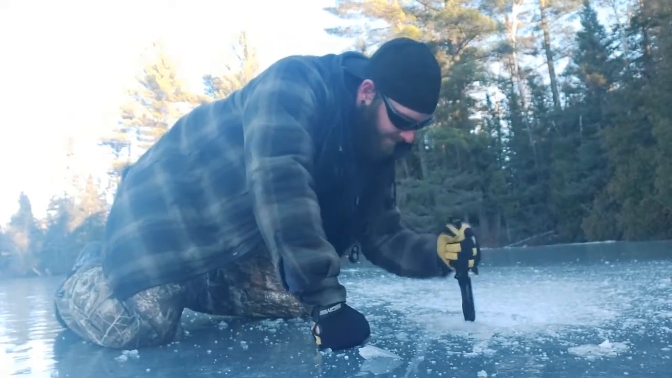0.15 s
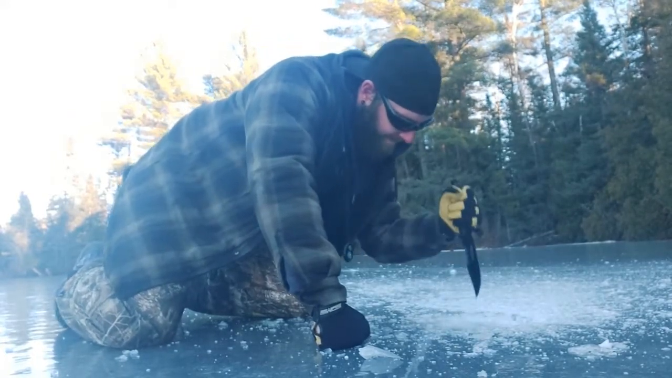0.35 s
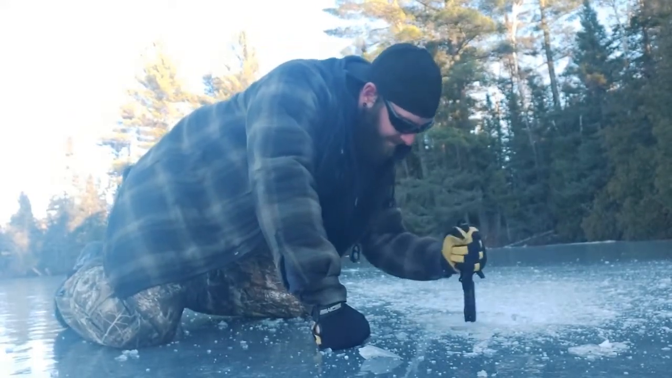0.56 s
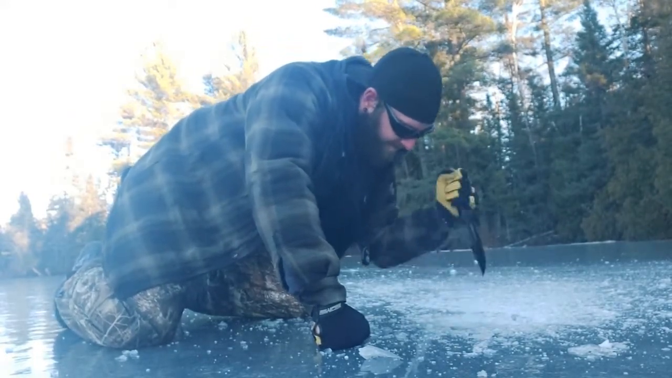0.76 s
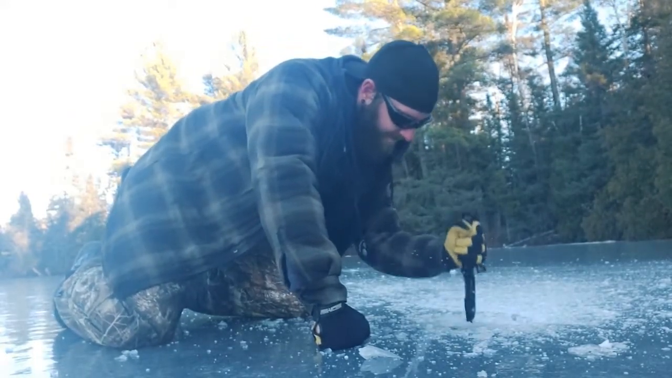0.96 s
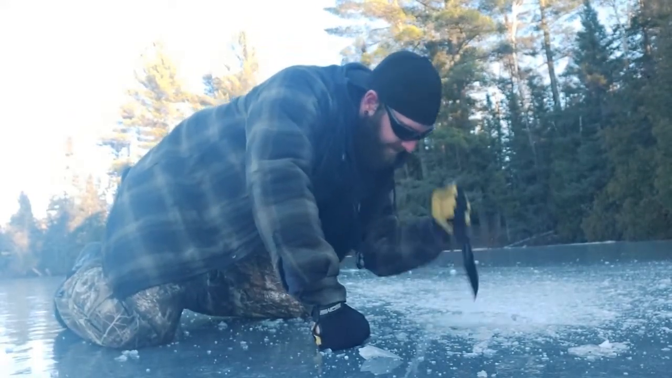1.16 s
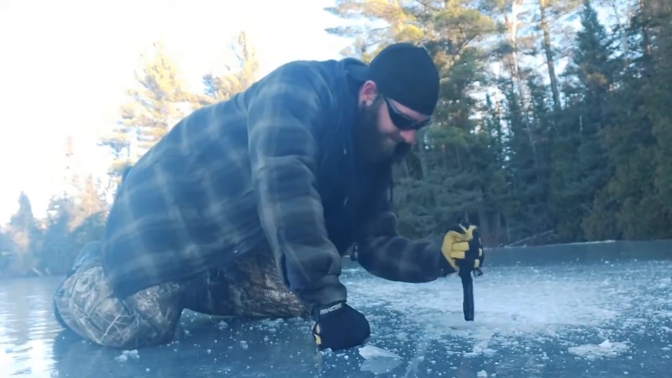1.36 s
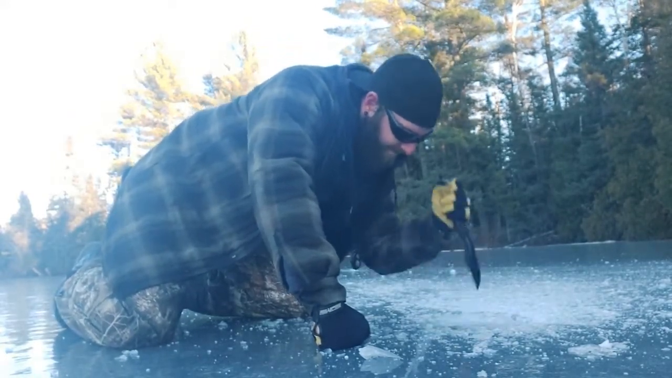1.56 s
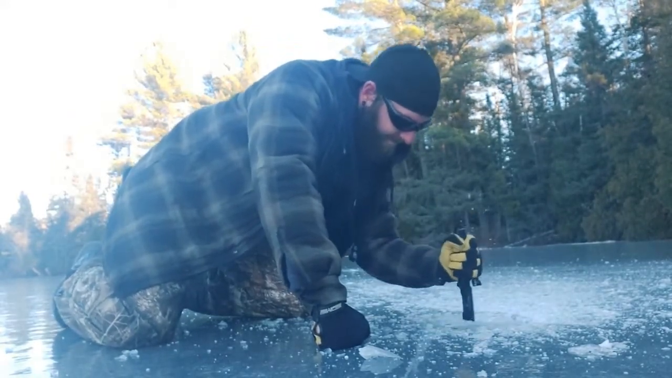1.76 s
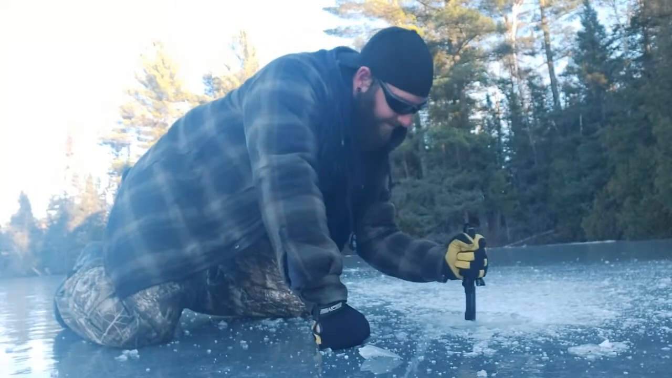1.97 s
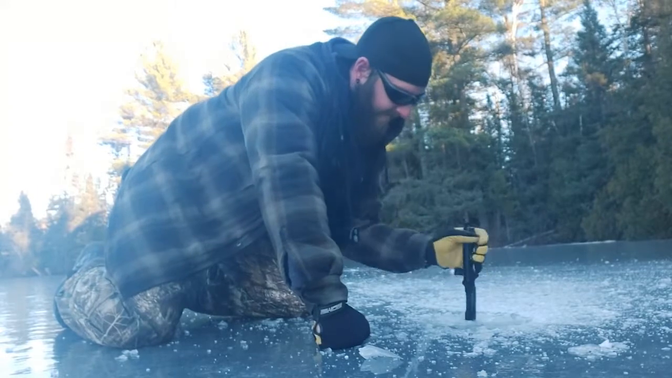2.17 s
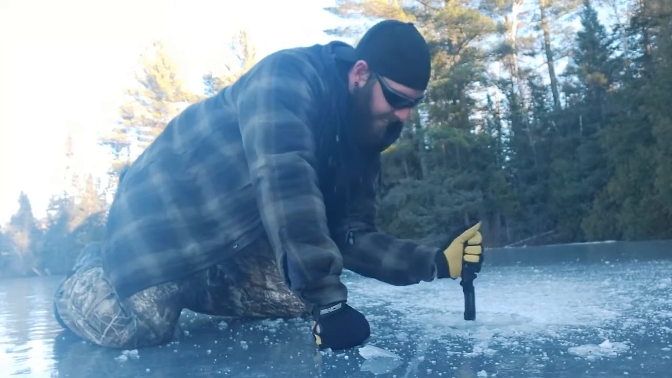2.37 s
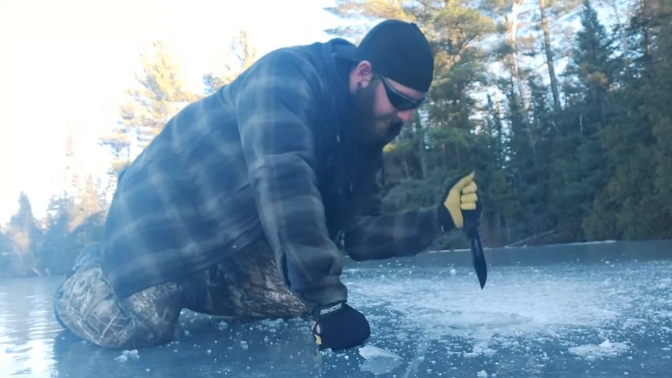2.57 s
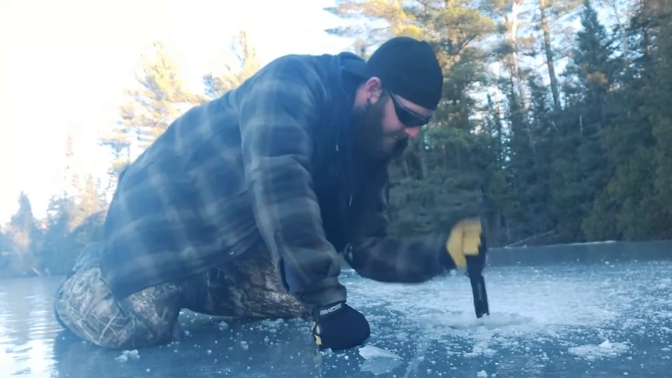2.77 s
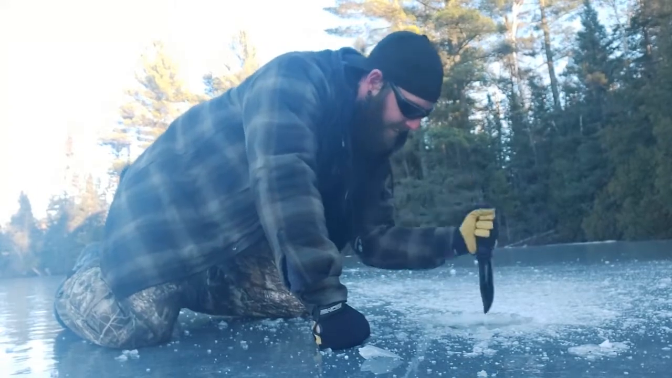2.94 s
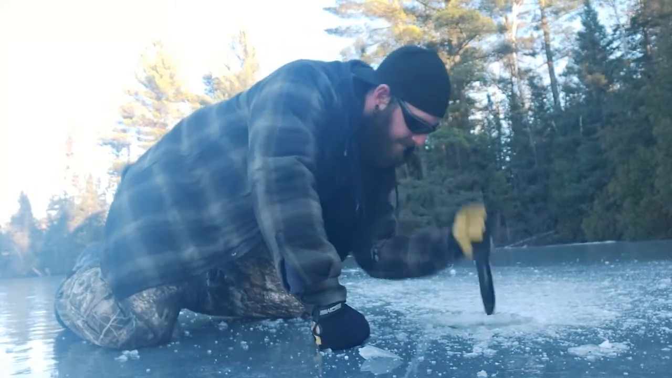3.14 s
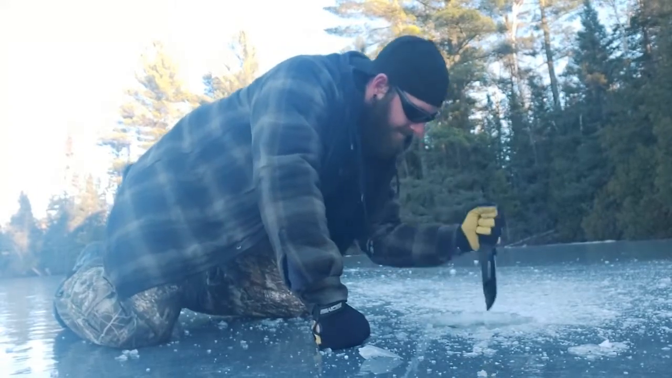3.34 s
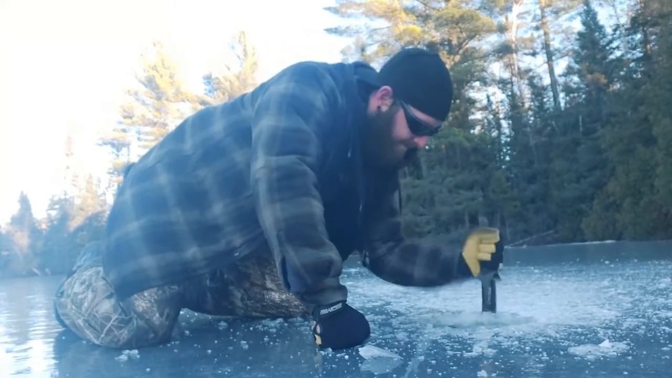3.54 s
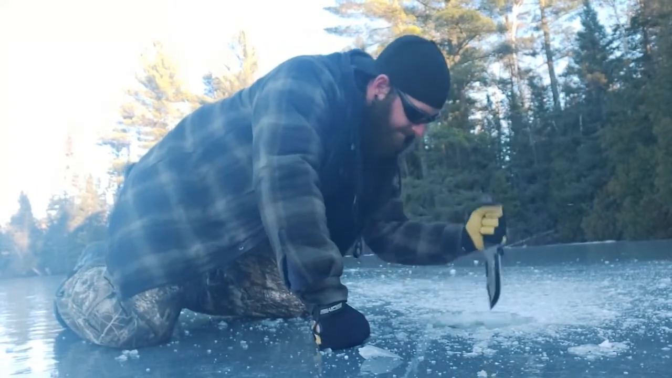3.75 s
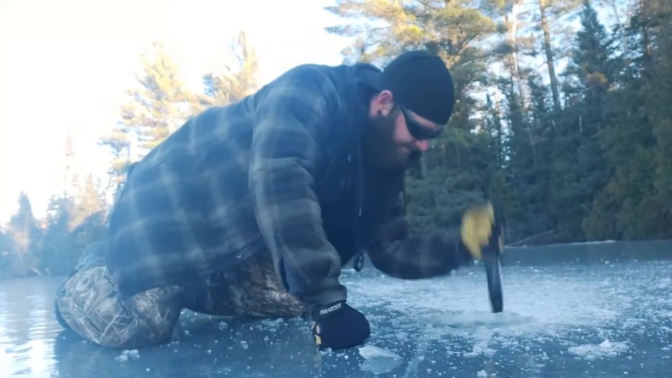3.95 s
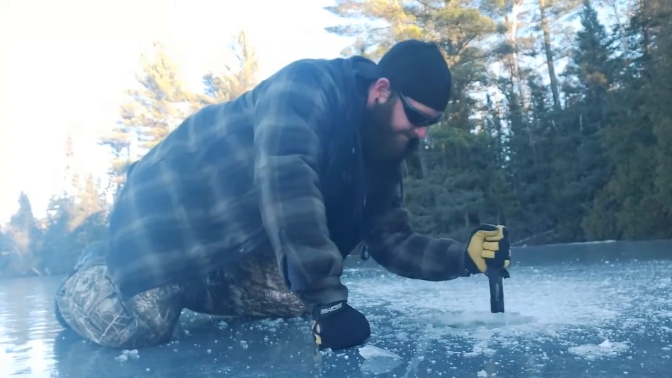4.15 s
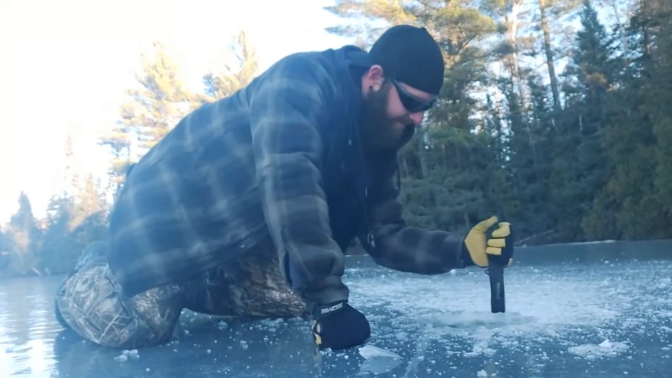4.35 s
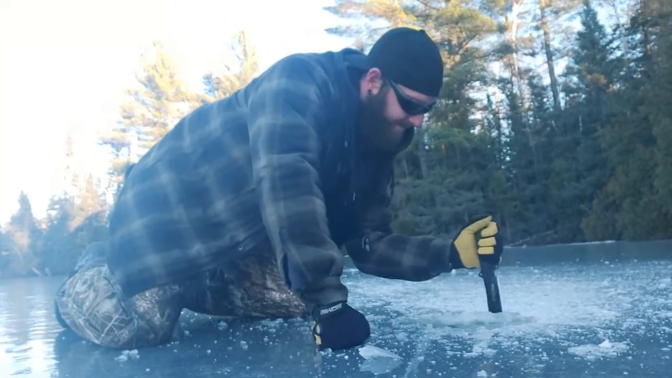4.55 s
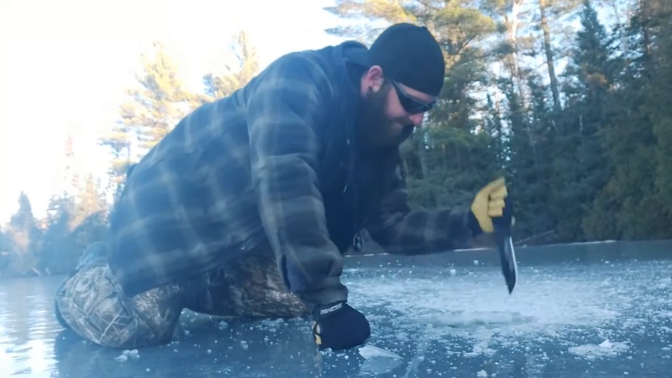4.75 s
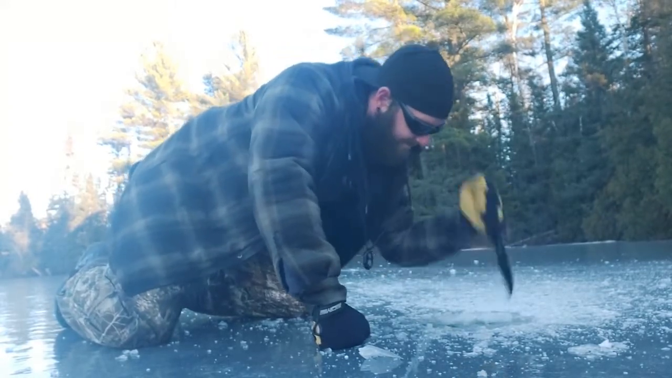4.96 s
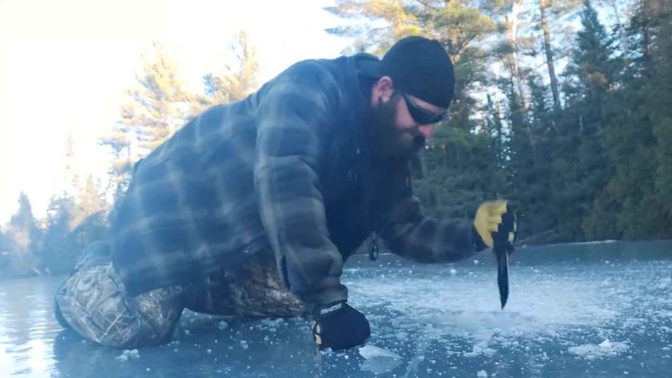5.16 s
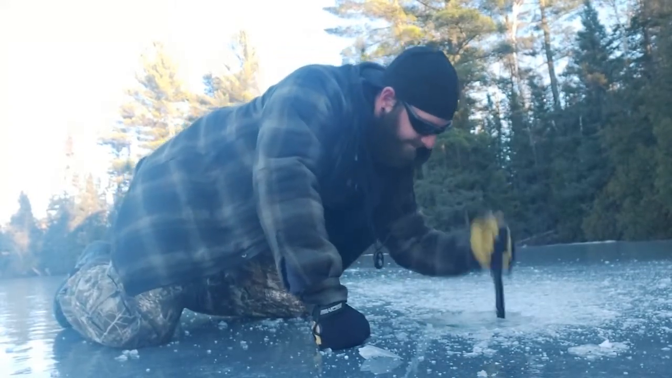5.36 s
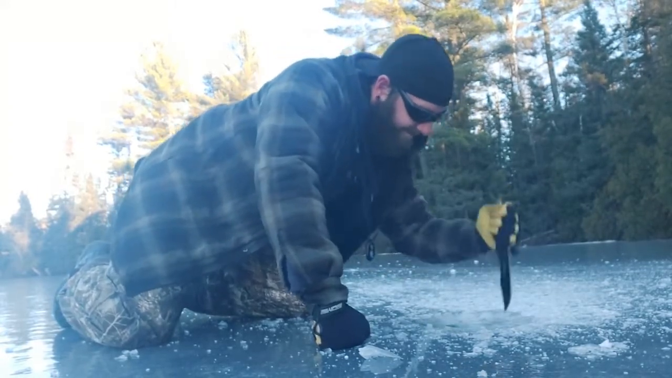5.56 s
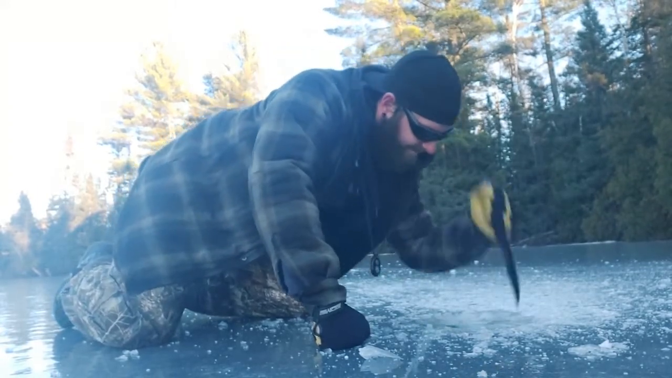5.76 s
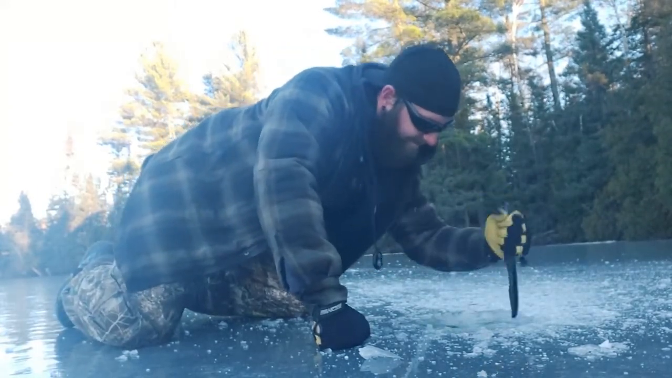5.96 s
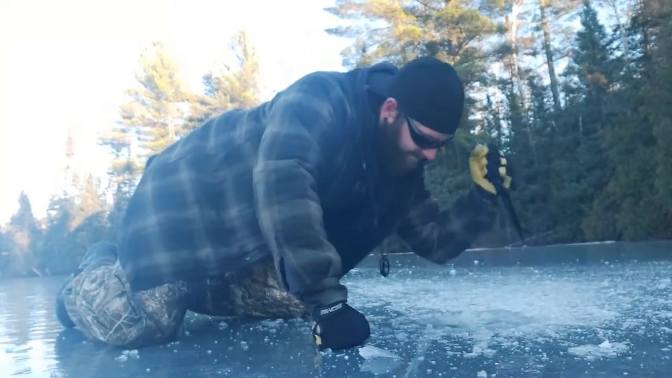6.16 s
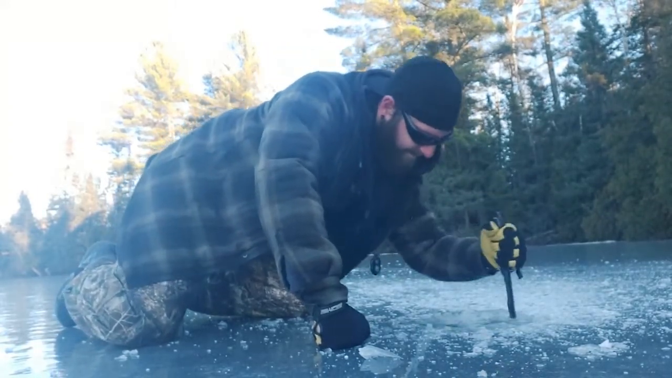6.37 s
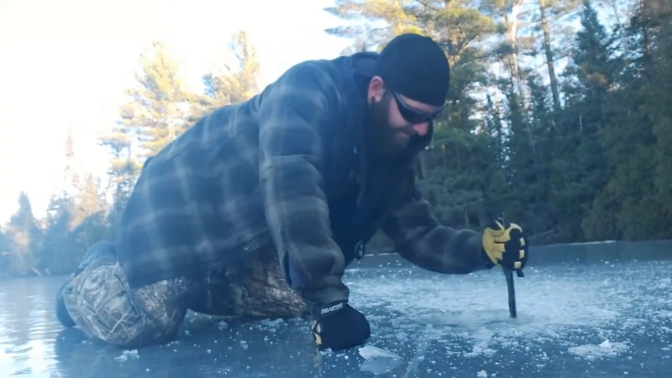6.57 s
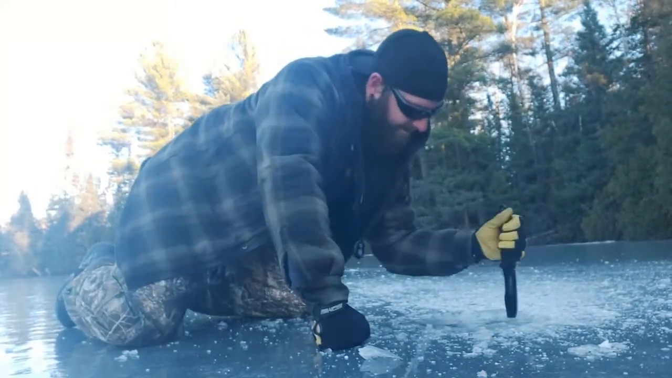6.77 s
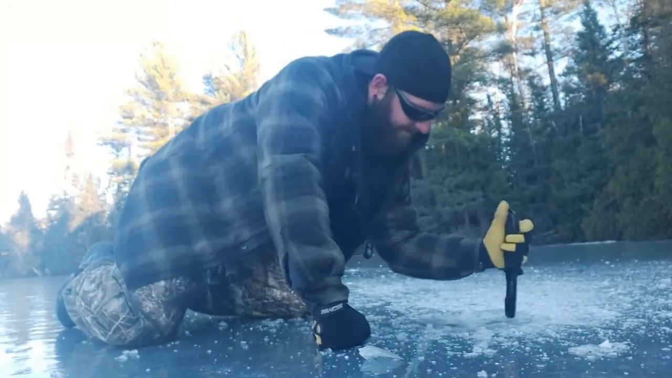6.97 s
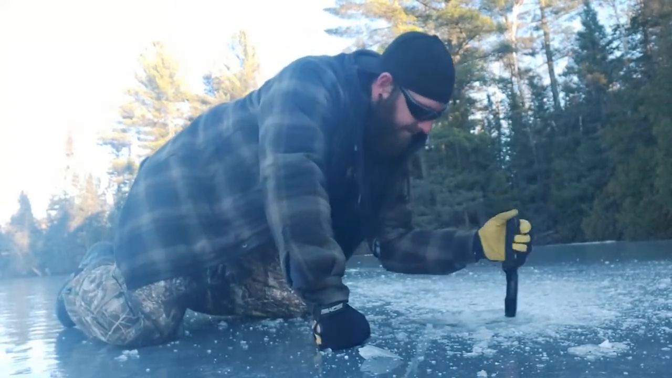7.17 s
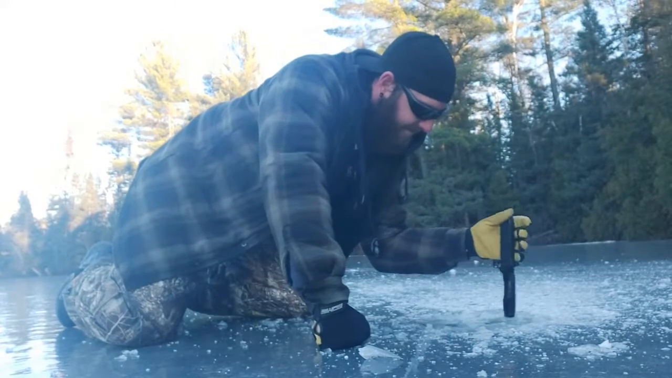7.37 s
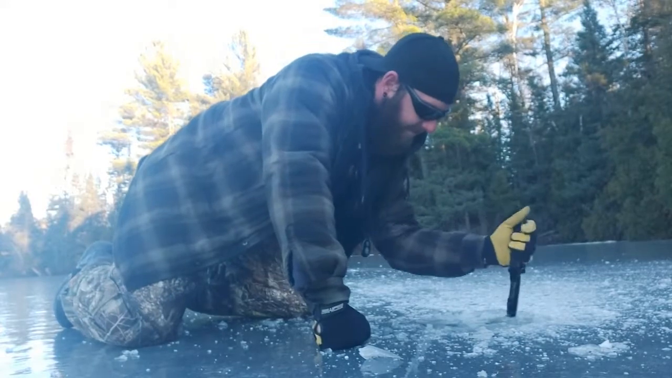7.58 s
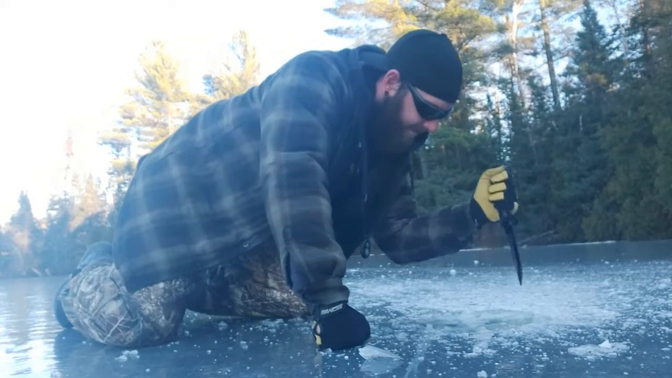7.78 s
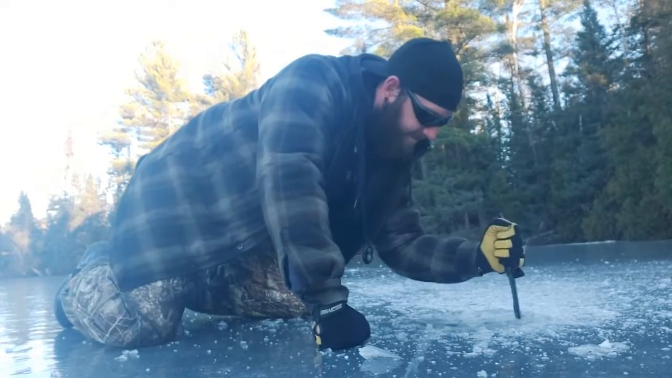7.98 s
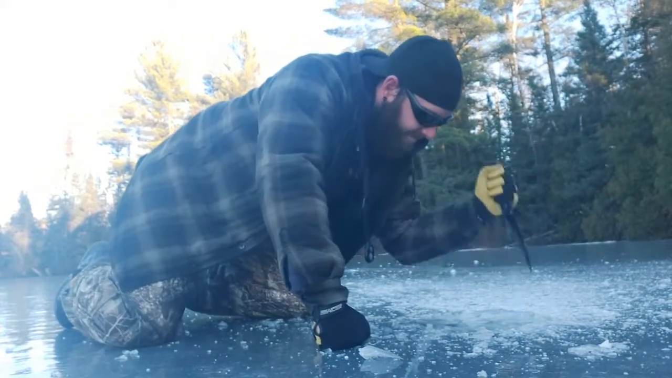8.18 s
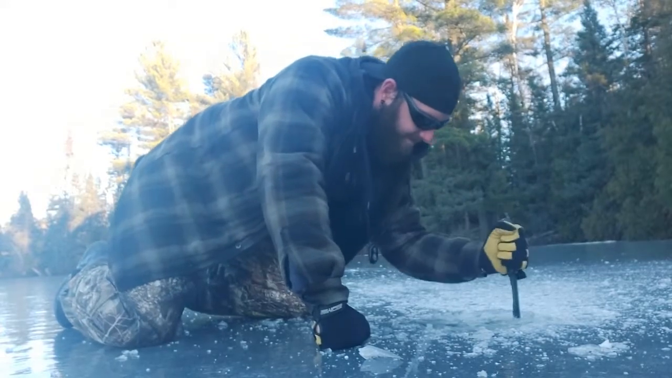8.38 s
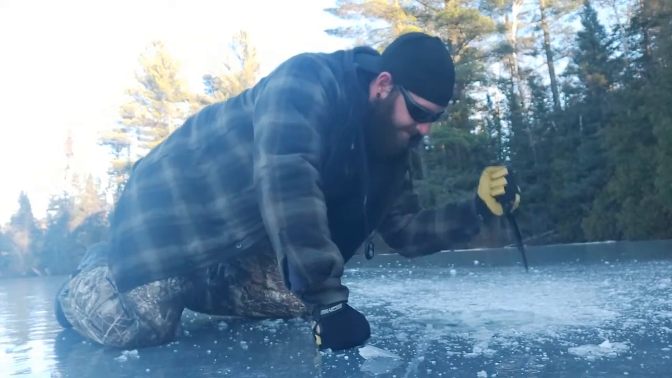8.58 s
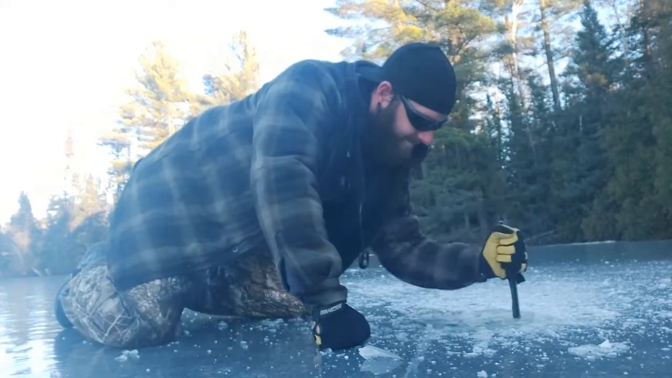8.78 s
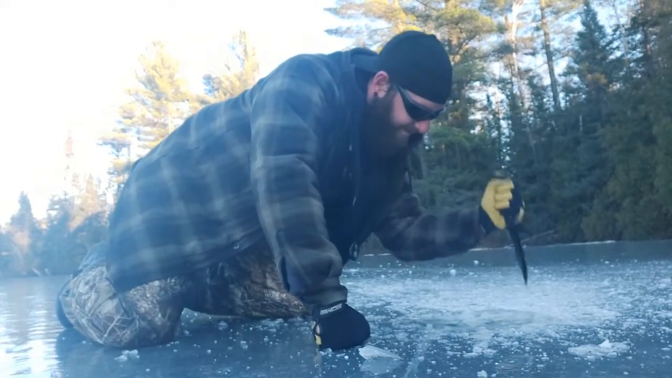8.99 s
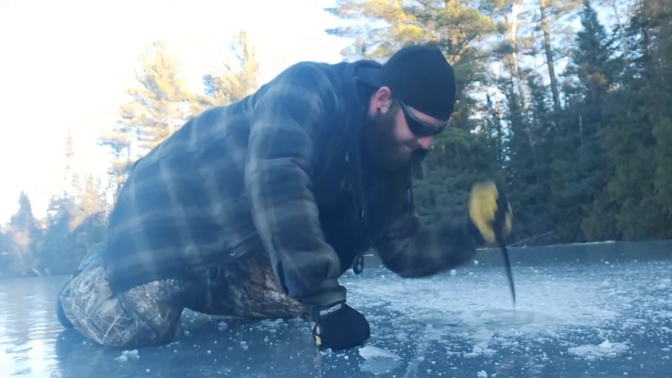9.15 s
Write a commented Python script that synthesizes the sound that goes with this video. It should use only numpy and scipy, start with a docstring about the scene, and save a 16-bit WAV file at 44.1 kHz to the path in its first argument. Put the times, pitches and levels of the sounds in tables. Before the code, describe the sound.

A knife stabs thick lake ice about a metre from the microphone, in four runs of strikes with pauses of a second or so between them. Each stab is a brittle crunch and crack ending in a dull thump, followed by chips ticking across the surface. In the pauses gloves and sleeves rustle softly and the blade faintly creaks loose. Wind gusts rumble on the microphone, easing towards the end.

```python
"""Stabbing lake ice in the wind

A knife stabs thick lake ice a metre from a small stereo microphone. Each stab crunches in by brittle
fracture, splits the ice and ends in a dull thump that excites the sheet's bending modes; chips spray,
skitter and tick over it. Gloves and sleeves rustle by friction, and the blade creaks and grinds loose
by stick-slip. Turbulent gusts buffet the two microphone ports independently."""
import sys
import numpy as np
from scipy import signal
from scipy.fft import rfft, irfft
from scipy.io import wavfile
from scipy.ndimage import uniform_filter1d, map_coordinates

SR = 44100
rng = np.random.default_rng(int(sys.argv[2]) if len(sys.argv) > 2 else 0)


def master_out(mix):
    """Clip the mix to full scale and print it as 16-bit PCM to the path in sys.argv[1]."""
    frames = np.transpose(np.atleast_2d(mix))
    ceiling = np.clip(frames, -1, 1)
    pcm = np.round(ceiling * 32767).astype(np.int16)
    wavfile.write(sys.argv[1], SR, pcm)


N = 406602
T = np.arange(N) / SR


def undb(db):
    return 10 ** (np.asarray(db) / 20)


def unit(x):
    return x / np.sqrt(np.mean(x ** 2))


def noise(*shape):
    return rng.standard_normal(shape + (N,))


def band(x, lo_hz, hi_hz, order=2):
    sos = signal.butter(order, [lo_hz, min(hi_hz, .45 * SR)], "band", fs=SR, output="sos")
    return signal.sosfilt(sos, x)


def colour(x, points):
    """Minimum-phase filter through (Hz, dB) points, by folding the cepstrum."""
    hz, db = np.transpose(points)
    grid = np.maximum(np.fft.rfftfreq(2048, 1 / SR), 1)
    cepstrum = irfft(np.interp(np.log(grid), np.log(hz), db) * np.log(10) / 20)
    cepstrum[1:1024] *= 2
    response = irfft(np.exp(rfft(cepstrum[:1024], 2048)))[None, :1024]
    return signal.fftconvolve(x, response, axes=-1)[..., :N]


def walk(rate):
    """Random modulation of unit RMS: levels held 1 / rate s, smoothed twice."""
    hold = int(SR / rate)
    steps = np.repeat(rng.standard_normal(N // hold + 1), hold)
    return unit(uniform_filter1d(uniform_filter1d(steps, hold), hold)[:N])


def add(track, s, sound):
    i = int(s * SR)
    if i < N:
        track[i:i + len(sound)] += sound[:N - i]


def ring(hz, t60, glide=0):
    """A damped mode whose pitch may rise as it dies."""
    t = np.arange(int(t60 * SR) + 8) / SR
    return np.sin(2 * np.pi * hz * t * (1 + glide * t / t60)) * undb(-60 * t / t60)


def burst(rise, fall):
    """Transient envelope: quadratic rise to 1, exponential decay."""
    t = np.arange(int((rise + 7 * fall) * SR)) / SR
    return np.where(t < rise, (t / rise) ** 2, np.exp(-(t - rise) / fall))


def gritty(spread_db, *shape):
    """Heavy-tailed noise: tiny impulses of widely scattered size."""
    return unit(noise(*shape) * undb(spread_db * np.minimum(rng.exponential(size=N), 4)))


BREEZE_DB = -39  # reference wind level for the flutter and the air
# Strength of the wind on the ports (time [s], level [dB])
WIND_LEVELS = [(0.0, -37), (0.46, -39.5), (1.15, -38.5), (1.85, -39), (2.4, -37), (2.73, -47), (2.95, -43),
               (3.36, -32), (3.82, -34.5), (4.11, -31), (4.52, -35), (5.29, -39.5), (5.6, -37),
               (6.35, -48.5), (6.9, -39.5), (7.09, -52), (7.2, -35.5), (7.35, -44), (7.62, -55.5),
               (7.84, -38), (8.3, -51.5), (8.85, -44), (8.98, -51), (9.22, -64)]
# The hardest single buffets (time [s], level [dB], frequency [Hz])
WIND_BUFFETS = [(0.612, -26, 280), (0.637, -25, 200), (0.922, -23, 277), (0.954, -25.5, 148),
                (1.189, -23, 80.5), (2.039, -27, 80), (2.126, -24.5, 89), (2.284, -24, 119),
                (3.135, -18.5, 107.7), (3.552, -23, 91), (4.094, -23.5, 80), (4.242, -24.5, 200),
                (4.304, -24, 290), (4.514, -26.5, 97.4), (5.634, -22.5, 88.85), (7.188, -29.5, 72),
                (7.284, -27.5, 110.7)]


def wind(gust_db=3.5, buffet_cycles=0.88):
    """Turbulent pressure: each port meets its own eddies, heard as rumble, flutter and buffets."""
    wind_db = np.interp(T, *np.transpose(WIND_LEVELS)) + gust_db * walk(30)
    flutter_db = -47.5 + 0.91 * (wind_db - BREEZE_DB)
    out = []
    for port_db in (1.2, 0):
        eddy_db = 8 * np.tanh(walk(50) / 2)
        rumble = unit(band(noise(), 57, 155)) + 0.18 * unit(band(noise(), 35, 60))
        rumble *= undb(wind_db + eddy_db)
        flutter = unit(band(noise(), 200, 418.5, order=3))
        flutter *= undb(flutter_db + 0.92 * eddy_db + 3 * walk(55))
        skirt = unit(band(noise(), 460, 750)) * undb(flutter_db - 21.5 + eddy_db)
        for s, db, hz in WIND_BUFFETS:
            size, phase = rng.standard_normal(2)
            width_s = buffet_cycles / hz
            t = np.arange(-2 * width_s, 2 * width_s, 1 / SR)
            swing = np.exp(-(t / width_s) ** 2) * np.cos(2 * np.pi * (hz * t + 0.058 * phase))
            add(rumble, s - width_s, undb(db + 2.2 * size) * swing)
        out.append(undb(port_db) * (rumble + flutter + skirt))
    return np.array(out)


# Spectrum of the open air (frequency [Hz], level [dB])
AIR_SPECTRUM = [(300, -6.5), (700, -8.5), (2000, -20), (4000, -22), (7000, -15), (12000, -21),
                (16000, -21.5)]


def air():
    """Ambient noise: a broadband floor that rises and falls slightly with the wind."""
    wind_db = uniform_filter1d(np.interp(T, *np.transpose(WIND_LEVELS)), SR // 4)
    air_db = -55.5 + 0.13 * (wind_db - BREEZE_DB) + 1.3 * walk(5)
    return undb(air_db) * unit(colour(noise(2), AIR_SPECTRUM))


# Modes of the ice sheet (frequency [Hz], level re thump [dB], 60 dB decay time [s])
SHEET_MODES = [(440, -14.5, 0.04), (597.3, -18.5, 0.034), (333, -15, 0.079), (170, -18.5, 0.04)]
# Knife stabs (time [s], crunch length [ms], crunch level [dB], entry crack level [dB],
# split delay [ms], knock level [dB], knock frequency [Hz], crack level [dB], crack frequency [Hz],
# thump delay [ms], thump level [dB], thump frequency [Hz], spray level [dB])
KNIFE_STABS = [(0.1868, 20.4, -18, -27, 11.5, -12.5, 1470, -10, 5000, 9.3, -7.5, 425, -51.5),
               (0.506, 31, -20.5, -37, 10.8, -8.5, 2500, -7.5, 6500, 9.4, -5, 424, -49.5),
               (0.8671, 28.5, -20, -10, 12.2, -7.5, 2230, -15.5, 4800, 15.4, -6, 390, -48.5),
               (1.2579, 19, -12, -17.5, 12.4, 1, 1130, -5, 6700, 10, -5.5, 495, -46.5),
               (1.6751, 11, -8.5, -18, 8.5, 1.5, 1114, -2.5, 6300, 10.1, -1.5, 395, -53),
               (2.8243, 16.4, -24, -11.5, 9.8, -16.5, 1170, -7.5, 12400, 11, -4, 417, -55.5),
               (3.1992, 23.3, -17.5, -11, 16, -19.5, 880, -17, 11500, 14.3, -14, 378, -50.5),
               (3.588, 11.4, -14, -9.5, 9.2, -6, 1430, -9, 5950, 9.3, 2, 387, -50),
               (4.0024, 18, -15.5, -56, 7.8, -13, 1660, -13, 5170, 9.9, 1, 402, -52.5),
               (5.013, 31.3, -19.5, -5.5, 12, -17.5, 806, -22, 5870, 17.3, -6.5, 384, -53),
               (5.425, 23, -16, -18.5, 12.4, -11.5, 1600, -17, 4400, 14, 0, 452, -51),
               (5.8483, 16, -15.5, -34, 4.56, -12, 1610, -18, 7330, 8.2, -6, 420, -54.5),
               (6.289, 30.7, -25.5, -19.5, 13.2, -26, 1060, -11, 6200, 11.4, -12.5, 440, -54.5),
               (7.9386, 19, -20, -41.5, 5.1, -21, 1220, -14.5, 5920, 9.7, -1.5, 434, -57.5),
               (8.3561, 19.5, -23, -41.5, 10.1, -17.5, 1520, -13.5, 5380, 12.6, -9, 437, -51.5),
               (8.7807, 17, -23, -30, 4.1, -11.5, 1550, -14.5, 6640, 6.8, -3, 438, -56),
               (9.2081, 14, -33.5, -38.5, 6, -23.5, 1550, -20, 5960, 9.6, -25.5, 426, -36)]


def stabs(entry_ms=2.3, plate_ratio=1.1):
    """Brittle fracture, then impact on the sheet. Returns direct (mono) and diffuse (stereo) sound."""
    crunch, knock, crack, shudder, murmur, out = np.zeros((6, N))
    grit = gritty(5.9) * undb(3.5 * walk(500))  # the ice gives way in jerks
    snap = noise()
    t = np.arange(-.005, .008, 1 / SR)
    thump_envelope = np.exp(-(t / np.where(t < 0, .0011, .0017)) ** 2 / 2)
    for (s, crunch_ms, crunch_db, entry_db, split_ms, knock_db, knock_hz, crack_db, crack_hz,
         thump_ms, thump_db, thump_hz, _) in KNIFE_STABS:
        depth = np.linspace(0, 1, int(crunch_ms * SR / 1000))
        swell = np.minimum(depth / 0.3, 1) * np.minimum((1 - depth) / 0.34, 1) ** 2
        add(crunch, s - .002, undb(crunch_db) * swell)
        # the skin cracks, then the ice splits; each time the loosened block knocks
        for ms, low_db, high_db in ((entry_ms, entry_db - 10.5, entry_db),
                                    (split_ms, knock_db, crack_db)):
            break_s = s + ms / 1000
            add(out, break_s - .0005, undb(low_db) * ring(knock_hz, t60=0.013))
            add(knock, break_s - .001, undb(low_db - 2.5) * burst(0.0006, 0.003))
            add(crack, break_s - .0008, undb(high_db) * burst(0.00083, 0.0015))
        # the plate that breaks off colours the crackle with its own pitch
        span = slice(int((s - .002) * SR), int((s + .05) * SR))
        plate = unit(band(grit, crack_hz / plate_ratio, crack_hz * plate_ratio, order=1)[span])
        out[span] += 0.561 * (crunch[span] + crack[span]) * plate
        add(shudder, s, undb(thump_db - 21.5) * burst(thump_ms / 1000, .0015))  # grows as the blade bites
        # the blade stops dead: a brief swing of the sheet, slowing as the bending wave spreads
        stop_s = s + thump_ms / 1000
        swing = -thump_envelope * np.cos(2 * np.pi * thump_hz * t * (1 - 30 * t) + 0.11)
        add(out, stop_s + t[0], undb(thump_db) * swing)
        add(murmur, stop_s, undb(thump_db - 33.5) * burst(0.017, 0.052))
        for hz, db, t60 in SHEET_MODES:
            size, detune = np.tanh(rng.standard_normal(2))  # no two pieces of ice ring alike
            mode = ring(hz * (1 + 0.093 * detune), t60)
            add(out, stop_s + .002, undb(thump_db + db + 2.5 * size) * mode)
    out += knock * unit(band(noise(), 520, 3100))
    out += undb(-6.5) * crack * unit(band(snap, 3500, 17000, order=3))
    out += shudder * unit(band(noise(), 420, 1600))
    out += murmur * unit(band(noise(), 240, 520))
    diffuse = undb(-4.5) * (crunch + crack) * unit(band(noise(2), 3500, 12000))
    body = 0.6 * unit(band(grit, 900, 3100, order=3))
    edge = 0.55 * unit(band(grit, 3300, 16000, order=3))
    return out + crunch * (body + edge), diffuse


def spray(grains=1400):
    """Shot noise of debris after each stab: a puff and patter nearby (mono), dust all around (stereo)."""
    puff, patter, hail = np.zeros((3, N))
    t = np.arange(int(.4 * SR)) / SR
    fallout = np.exp(-t / 0.22) / (1 + (t / 0.2) ** 3)
    for s, crunch_ms, crunch_db, *_, spray_db in KNIFE_STABS:
        add(puff, s + .6 * crunch_ms / 1000, undb(crunch_db - 15) * burst(0.004, 0.014))
        add(patter, s + .5 * crunch_ms / 1000, undb(spray_db) * fallout)
    for when, pitch, size in rng.random((grains, 3)):
        add(hail, when * N / SR, undb(-4.5 * np.log(size + .06)) * ring(3000 * 4.5 ** pitch, .0015))
    fine = gritty(3.5, 2)
    # coarse and fine bits land in their own patches, octave by octave
    dust = unit(sum(band(fine, hz, 2 * hz, order=1) * undb(3.6 * walk(28) + 2.5 * walk(220))
                    for hz in (1207, 2408, 4800, 9600)))
    near = puff * undb(3.6 * walk(300)) * unit(band(gritty(4.7), 900, 9000, order=1))
    near += undb(0.45) * patter * unit(hail)
    return near, undb(6.5) * patter * dust


# Small chips ticking on the sheet (time [s], level [dB], frequency [Hz])
CHIP_TICKS = [(0.323, -27, 5690), (0.6696, -27, 5340), (1.0351, -17.5, 8300), (1.3682, -22, 6640),
              (2.5043, -35, 6030), (2.576, -35, 5800), (3.421, -16.5, 6450), (4.0955, -24.5, 7000),
              (4.121, -25, 7460), (5.646, -29.5, 5150), (5.9282, -30, 6340), (5.9598, -24.5, 7000),
              (6.928, -31, 4070), (6.979, -37, 6460), (7.5044, -34, 7080), (8.416, -18, 9300),
              (8.42, -20, 4080), (8.4274, -9, 5800), (8.835, -28, 11800)]
# Bigger lumps landing (time [s], level [dB], frequency [Hz], upward glide [ratio])
LUMP_LANDINGS = [(1.297, -32, 1407, 0.047), (1.366, -30, 2040, 0.047), (1.394, -34.5, 770, 0.16),
                 (1.425, -42.5, 1410, 0.28), (3.751, -42.5, 1540, 0.22), (5.502, -26, 1580, 0.58),
                 (6.454, -42.5, 870, 1.86), (7.191, -41, 1290, 0.073), (8.118, -42.5, 1245, 0.023)]


def chips():
    """Impact excitation: each piece lands with a click and rings in one damped mode."""
    out, click = np.zeros((2, N))
    for s, db, hz in CHIP_TICKS:
        add(out, s, undb(db) * ring(hz, t60=0.0037))
        add(click, s, undb(db - 9.5) * burst(0.00015, 0.002))
    for s, db, hz, glide in LUMP_LANDINGS:
        add(out, s, undb(db) * ring(hz, 0.026 * (1 + glide), glide))
        add(click, s, undb(db - 9.5) * burst(.0005, 0.0018))
    return out + click * band(noise(), 2500, 19000, order=1)


# Glove and sleeve movements (centre time [s], duration [s], level [dB])
FABRIC_MOVES = [(0.414, 0.14, -59), (1.797, 0.079, -48), (1.938, 0.15, -58), (2.1, 0.32, -54),
                (2.41, 0.47, -53.5), (2.813, 0.15, -55), (2.979, 0.2, -57), (4.28, 0.49, -57),
                (6.227, 0.2, -61.5), (6.71, 0.19, -54.5), (6.957, 0.15, -52.5), (7.832, 0.29, -59)]


def rustle():
    """Sliding friction of fabric: swells of fibrous noise whose three bands flicker separately."""
    level = np.zeros(N)
    for s, length, db in FABRIC_MOVES:
        add(level, s - length / 2, undb(db) * signal.windows.tukey(int(length * SR), .9))
    fibres = gritty(5.4, 2)
    weave = undb(2.3 * walk(120)) * unit(band(fibres, 4600, 7900))
    sheen = undb(-4 + 6.3 * walk(14)) * unit(band(fibres, 10500, 17000))
    drag = undb(-12 + 3 * walk(30)) * unit(band(fibres, 1000, 2800))
    return level * (weave + sheen + drag)


def creak(first_s=4.182, last_s=4.282, slips=11):
    """Stick-slip of steel in ice: the blade works loose in a nearly regular train of pings."""
    out = np.zeros(N)
    for s in np.linspace(first_s, last_s, slips):
        late, size, pitch = rng.standard_normal(3)
        add(out, s + 0.002 * late, undb(-35.5 + 2 * size) * ring(5600 * (1 + .07 * pitch), t60=0.0051))
    return out


# Modes of the steel blade (frequency [Hz], relative level [dB])
BLADE_MODES = [(2450, 4), (3800, 0), (5200, -3), (6600, -4), (8800, -3)]


def scrape(start_s=6.823):
    """Forced vibration: friction sets the blade ringing as it grinds out of its slot."""
    grind = np.zeros(N)
    add(grind, start_s, undb(-39.5) * burst(0.047, 0.012))
    grind *= gritty(6)
    steel = sum(undb(db) * ring(hz, t60=0.014)[:500] for hz, db in BLADE_MODES)
    ringing = np.convolve(grind, steel / np.linalg.norm(steel))[:N]
    return ringing + 2 * np.gradient(grind)


# Lag of the knife's sound at the right port (time [s], delay [samples])
RIGHT_LAG = [(0, 7), (6, 9), (9.2, 8)]


def ports(x, left_db=-2.02):
    """Time and level differences: direct sound is later and a little stronger at the right port."""
    late = np.arange(N) - np.interp(T, *np.transpose(RIGHT_LAG))
    return np.array([undb(left_db) * x, map_coordinates(x, [late], order=3)])


def scene():
    """Superposition: direct sound reaches both ports, while diffuse sound differs at each."""
    knife, diffuse_crunch = stabs()
    near_spray, dust = spray()
    ambience = air()
    direct = knife + chips() + creak() + scrape() + near_spray
    return ports(direct) + diffuse_crunch + dust + rustle() + ambience + wind()


# Response of the microphone (frequency [Hz], gain [dB])
MIC_RESPONSE = [(1200, -4), (2200, -5.5), (2900, -10.5), (4300, -12), (6400, -12.5), (7700, -12.5),
                (8400, -19), (10000, -18.5), (12500, -14), (15500, -17.5), (16300, -30.5)]


def record(dry):
    """Port resonance: bumps near 6 and 12 kHz on a falling treble, then a steep low-pass."""
    lowpass = signal.ellip(10, .2, 80, 16750, fs=SR, output="sos")
    return signal.sosfilt(lowpass, colour(dry, MIC_RESPONSE))


dry = scene()
out = record(dry)
master_out(out)
```